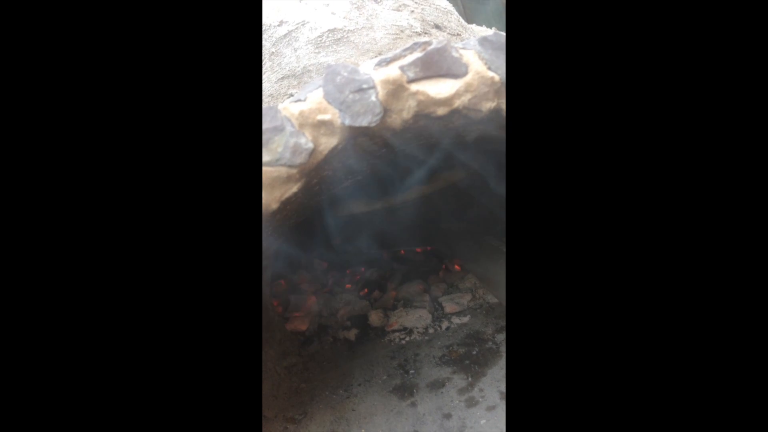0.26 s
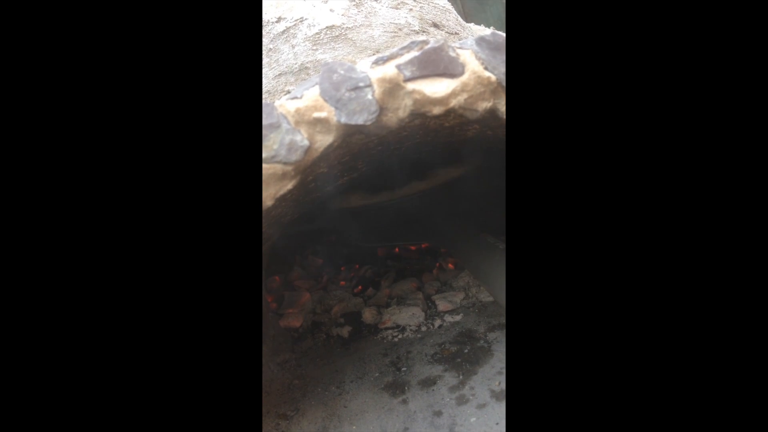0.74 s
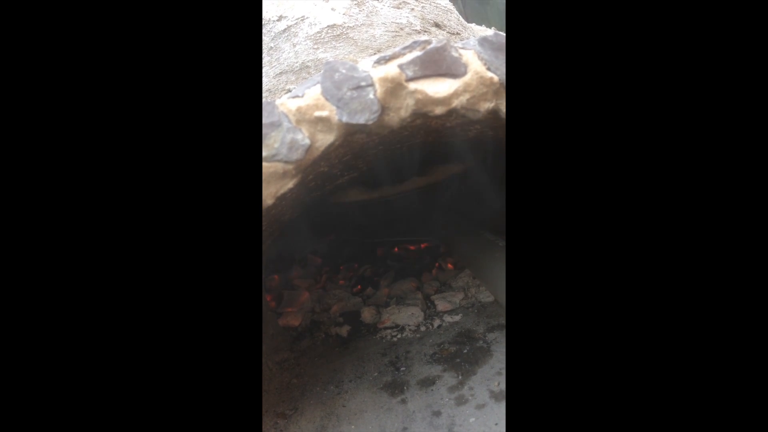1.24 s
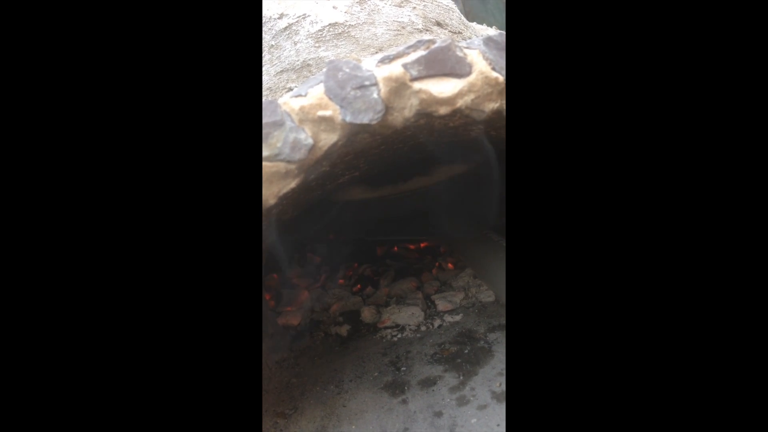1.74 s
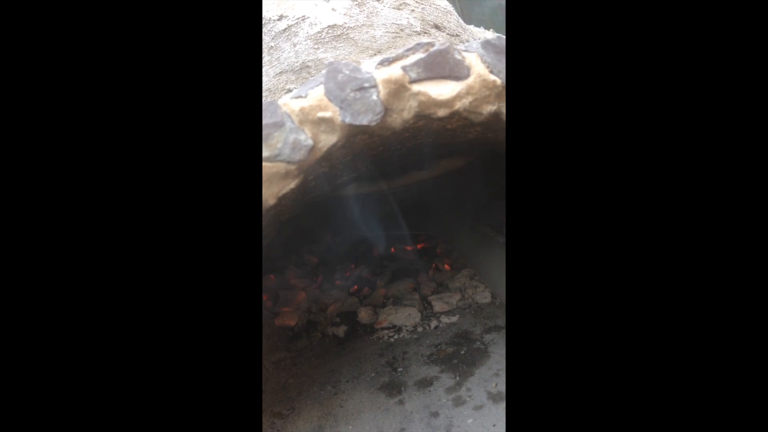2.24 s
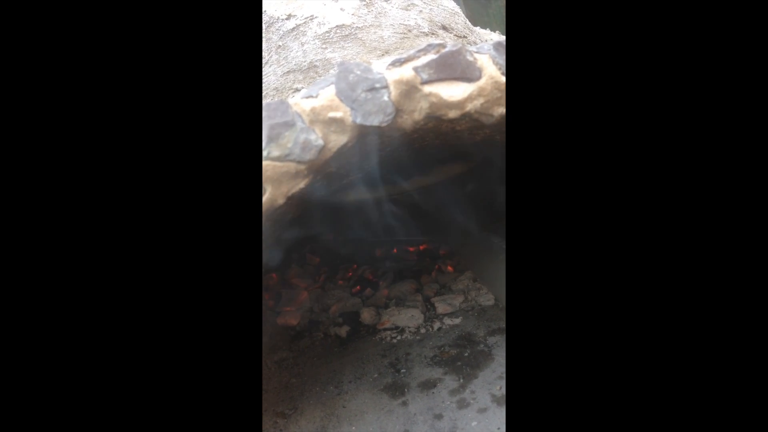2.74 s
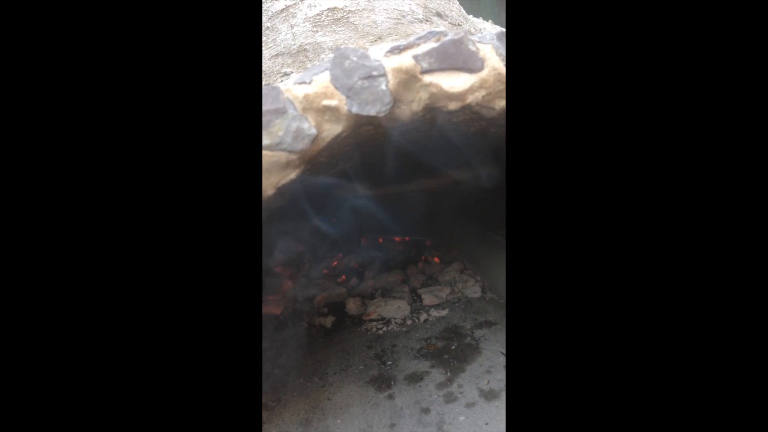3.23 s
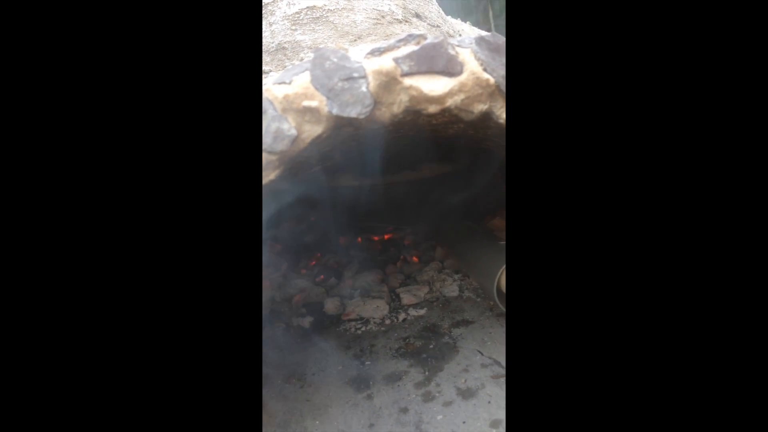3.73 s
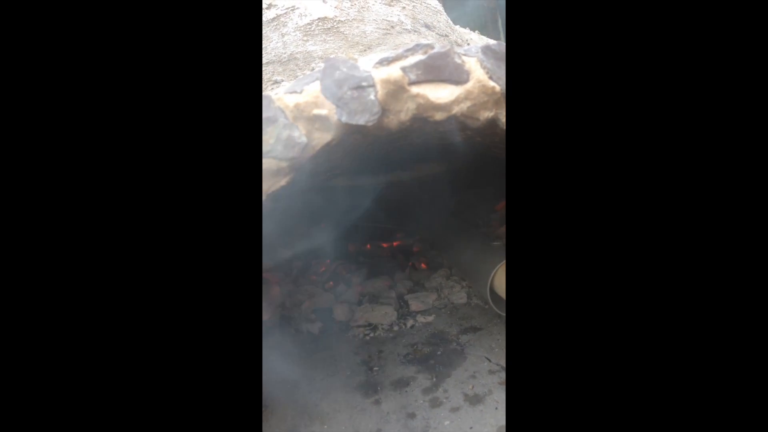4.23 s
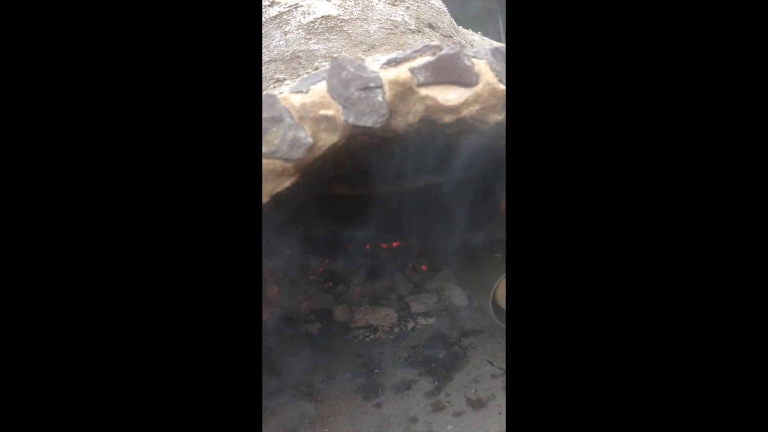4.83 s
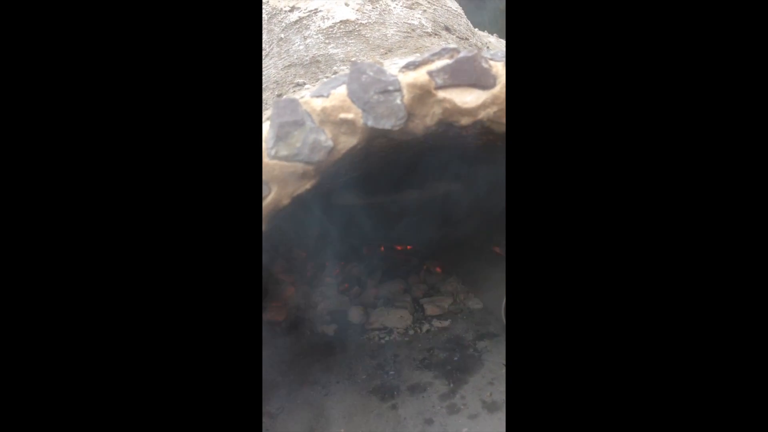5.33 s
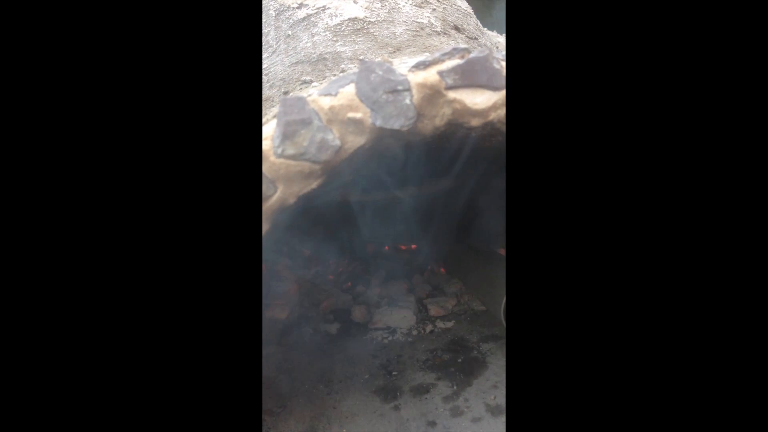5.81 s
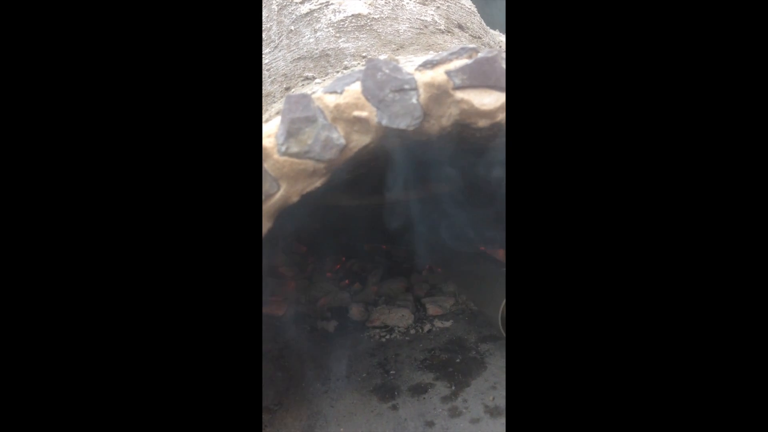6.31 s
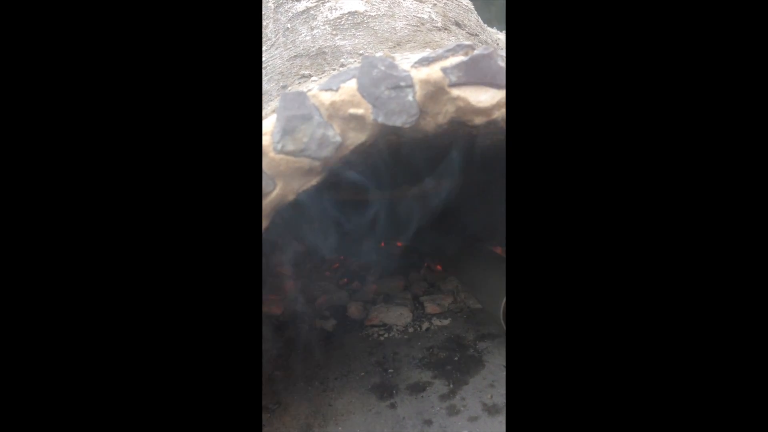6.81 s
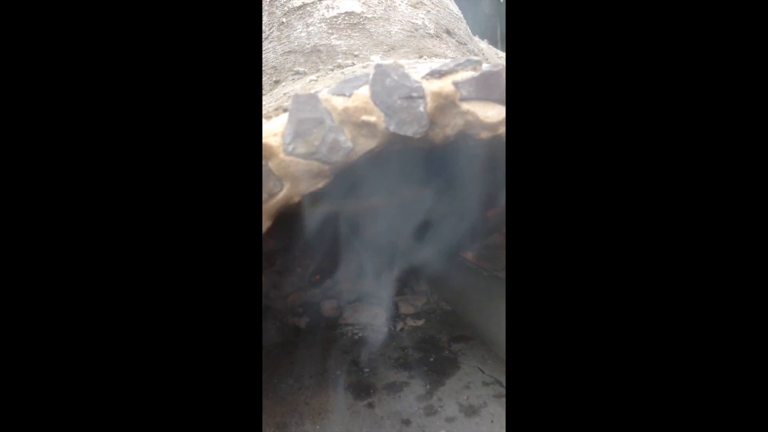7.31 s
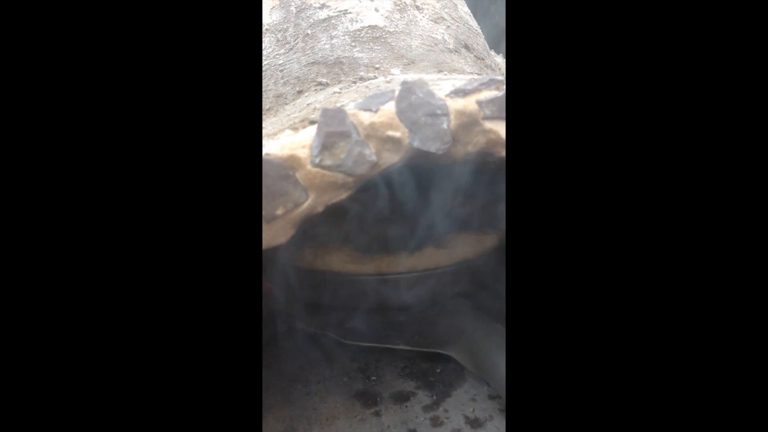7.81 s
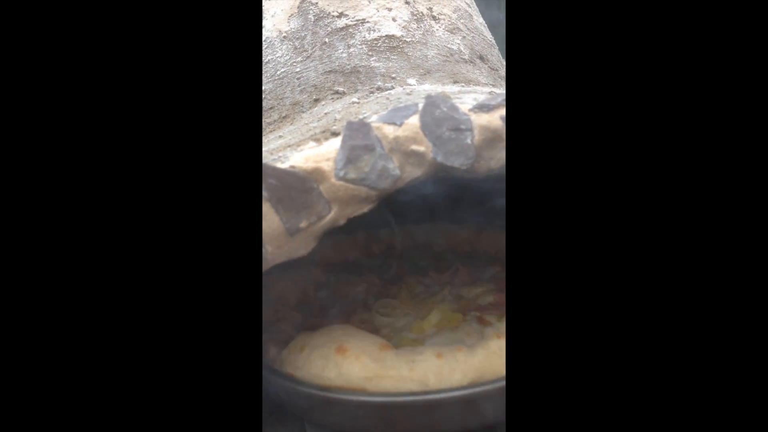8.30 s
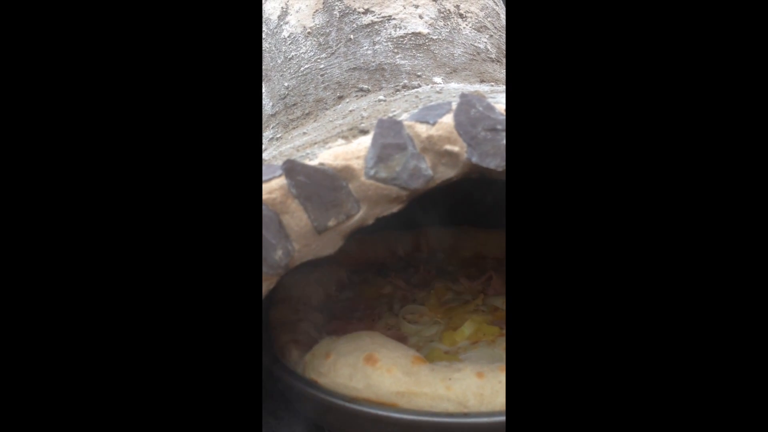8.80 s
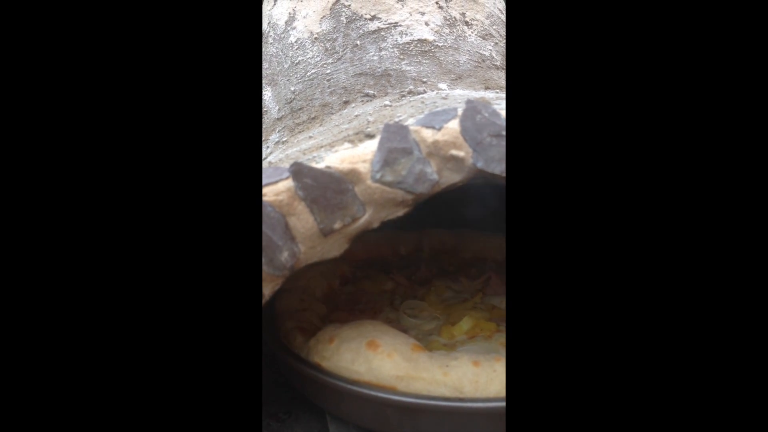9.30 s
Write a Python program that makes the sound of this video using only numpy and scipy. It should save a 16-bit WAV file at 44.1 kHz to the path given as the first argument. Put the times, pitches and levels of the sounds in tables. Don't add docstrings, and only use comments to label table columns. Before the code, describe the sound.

Close to the mouth of a small outdoor stone oven, hot charcoal ticks and snaps irregularly over a very faint, fine sizzle. A few snaps leap out sharply. Soft metallic nudges come partway through, then a small crumble of coals. Near the end a metal pan is knocked hard and dragged over stone, scraping grit, while crackling continues. Distant traffic and a low machine hum lie underneath.

```python
import sys
import numpy as np
from scipy import signal
from scipy.fft import rfft, irfft
from scipy.io import wavfile
from scipy.ndimage import uniform_filter1d

SR = 44100
rng = np.random.default_rng(int(sys.argv[2]) if len(sys.argv) > 2 else 0)


def inscribe(sig):
    pcm = np.round(np.clip(np.atleast_2d(sig).T, -1, 1) * 32767)
    wavfile.write(sys.argv[1], SR, pcm.astype(np.int16))


def volts(x):
    e = np.asarray(x, float) / 20
    return 10 ** e


N = 421141


def evened(x):
    return x / np.sqrt(np.mean(x ** 2) + 1e-20)


def add(mix, s, sound):
    part = mix[round(s * SR):][:len(sound)]
    part += sound[:len(part)]


def coloured(x, points):
    hz, db = np.transpose(points)
    bins = np.fft.rfftfreq(len(x), 1 / SR)
    gain_db = np.interp(np.log(bins + 1), np.log(hz + 1), db)
    return irfft(rfft(x) * volts(gain_db), len(x))


def resonate(x, hz, width_hz):
    r = np.exp(-np.pi * width_hz / SR)
    poles = [1, -2 * r * np.cos(2 * np.pi * hz / SR), r * r]
    return (1 - r * r) / 2 * signal.lfilter([1, 0, -1], poles, x)


def wander(rate_hz):
    steps = rng.standard_normal(int(N / SR * rate_hz) + 2)
    return evened(np.interp(np.arange(N) / SR * rate_hz, np.arange(len(steps)), steps))


def flutter(size, depth_db, samples):
    return volts(depth_db * evened(uniform_filter1d(rng.standard_normal(size), int(samples))))


def rings(modes, t, spread_db):
    out = np.zeros(len(t))
    for hz, db, t60_s in modes:
        level_luck, pitch_luck = rng.standard_normal(2)
        fade = volts(db + spread_db * level_luck - 60 * t / t60_s)
        out += fade * np.sin(2 * np.pi * hz * (1 + 0.0053 * pitch_luck) * t)
    return out


# (frequency [Hz], level [dB])
SPLIT_SPECTRUM = [(500, -64), (1100, -62), (1500, -8.5), (2500, -11), (3200, -9.5), (4400, -5.5),
                  (6600, -3.5), (9100, 2), (14000, -2), (17000, 0.5)]
# (frequency [Hz], level [dB], t60 [s])
DOME_MODES = [(1510, -16, 0.02), (3280, -15.5, 0.0064), (4294, -16.5, 0.034), (9300, -17, 0.012)]


def snap(hz, bright_db):
    t = np.maximum(np.arange(1024) / SR - 0.001, 0)
    split = np.minimum(t / 0.00065, 1) * volts(-60 * np.maximum(t - 0.0007, 0) / 0.0034)
    echoes = volts(-15 - 60 * t / 0.029) * (t > 0)
    spectrum = rfft(rng.standard_normal(1024) * (split + echoes))
    even = irfft(spectrum / np.sqrt(uniform_filter1d(abs(spectrum) ** 2, size=60)))
    tilt = [(5000, 0.012), (8000, 0.7 * (bright_db + 6))]
    burst = coloured(coloured(even, SPLIT_SPECTRUM), tilt)
    ring_db = 6 - 0.36 * (bright_db + 12)
    burst = burst + volts(ring_db) * resonate(burst, hz, 0.035 * hz)
    burst = burst / abs(burst).max()
    dome_db = -11.5 - 0.33 * (bright_db + 22.5)
    return burst + volts(dome_db) * rings(DOME_MODES, t, 3)


# (time [s], peak [dB], chip pitch [Hz], share above 7 kHz [dB])
SNAPS = [(0.439, -33, 4200, -9), (1.065, -29.5, 4360, -7.5), (1.4193, -32, 4160, -8),
         (1.6095, -14.5, 11000, -8.5), (2.3413, -33, 2970, -21), (2.4654, -7, 8800, -15),
         (2.523, -31.5, 9100, -20), (2.5496, -26, 9300, -6), (2.5661, -17, 8840, -13),
         (2.6119, -32, 9940, -25), (2.8192, -30.5, 4250, -12), (2.8322, -26, 10200, -8),
         (3.4045, -14, 10900, -5.5), (3.9071, -19, 11400, -18), (4.1768, -30.5, 12400, -8),
         (0.8796, -37.5, 4240, -48), (6.1368, -18, 4160, -15), (6.1578, -28, 4400, -18),
         (6.1912, -33, 2280, -18), (6.21, -31.5, 2350, -27), (6.6813, -30, 5960, -23),
         (7.6151, -32, 3560, -34), (8.1547, -6.5, 8430, 1.5), (8.195, -26, 7950, -4),
         (8.5036, -32, 12900, -4), (8.9735, -33, 10350, -4), (9.1244, -27, 6500, -11.5),
         (9.3327, -24.5, 6300, -15.5), (9.42, -26.5, 3450, -32.5), (9.4881, -27, 6400, -17.5)]
# (time [s], peak [dB])
LARGE_TICKS = [(1.713, -39.5), (1.8004, -39), (1.815, -42), (1.884, -45), (1.986, -45), (2.5084, -40),
               (2.7863, -44), (3.017, -39), (3.2882, -39), (4.021, -41), (7.1856, -42), (7.4874, -46),
               (7.6575, -39.5), (7.9553, -44), (9.0688, -39), (9.1057, -41), (9.2528, -40.5), (9.2913, -40)]
MEDIUM_TICKS = [(0.1, -35.5), (.171, -45), (0.186, -39), (.2643, -39.5), (0.2894, -43), (.4963, -46),
                (0.5923, -38.5), (0.721, -44), (.9911, -40), (1.1413, -42), (1.1662, -34.5),
                (1.2413, -39.5), (1.505, -45), (1.5464, -38.5), (1.679, -47), (1.7482, -40.5),
                (1.7923, -39), (2.3324, -35), (2.4094, -41), (2.7144, -36.5), (2.9394, -38), (2.9504, -40),
                (3.2733, -33), (4.4442, -43), (4.6878, -40.5), (4.83, -49.5), (5.05, -45), (6.2539, -44),
                (6.63, -40), (9.1548, -36)]
SMALL_TICKS = [(.1251, -41), (.9472, -41.5), (1.0987, -41), (1.113, -38), (2.1306, -44), (2.501, -40),
               (3.101, -44), (3.4726, -34.5), (6.2302, -37), (6.3773, -40), (6.6161, -39), (6.6522, -41),
               (7.5722, -40.5), (7.58, -39.5), (7.8554, -44), (8.6914, -37.5), (8.761, -41), (8.781, -33.5),
               (8.855, -35), (8.8642, -37.5), (9.176, -40), (9.207, -37.5)]
TINY_TICKS = [(.0687, -35.5), (.1979, -34), (.2179, -36.5), (.6724, -35), (2.3544, -39), (2.373, -44),
              (2.7608, -44), (2.882, -37), (3.0287, -33.5), (3.1444, -43), (3.1794, -37), (3.2133, -40),
              (3.516, -40), (3.5963, -39.5), (3.9521, -38), (4.008, -37), (4.0527, -38), (4.5687, -37),
              (4.956, -34.5), (4.9828, -38), (5.9105, -40.5), (6.0946, -36), (7.253, -38.5),
              (6.7448, -38.5), (6.7697, -40), (7.8411, -40), (8.819, -37.5), (9.431, -33), (9.5232, -37),
              (9.534, -42)]
# (pitch [Hz], pitch spread [0-1], share above 7 kHz [dB])
CHIPS = [
    (3280, .03, -27.5),
    (4220, 0, -24),
    (6500, 0.11, -23),
    (10400, 0.19, -16),
]
# (frequency [Hz], level [dB])
THIN = [(2200, -3.5), (3200, -1)]


def coals():
    loud, ticking = np.zeros((2, N))
    lead_s = 0.0004
    for s, db, hz, bright_db in SNAPS:
        add(loud, s - lead_s, volts(db - 0.5) * snap(hz, bright_db))

    tables = (LARGE_TICKS, MEDIUM_TICKS, SMALL_TICKS, TINY_TICKS)
    for table, (hz, spread, bright_db) in zip(tables, CHIPS):
        for s, db in table:
            chip_hz = hz * np.exp(spread * rng.uniform(-1.7, 1.7))
            add(ticking, s - lead_s, volts(db - 1.5) * snap(chip_hz, bright_db))

    s, _, lively_db = np.transpose(SIZZLE)
    ticks_per_s = 160 * volts(1.1 * np.interp(np.arange(N) / SR, s, lively_db))
    level_db = -56.5 + 2.8 * np.minimum(rng.exponential(1, N), 3) + np.zeros(N)
    excess = (level_db + 56.5) / 2.8
    ticks = (rng.random(N) < ticks_per_s / SR) * volts(-56.5 + 2.8 * excess)
    kind = rng.integers(0, 12, N)
    for k, hz in enumerate(np.geomspace(2900, 7000, 12)):
        ticking += signal.oaconvolve(ticks * (kind == k), snap(hz, -22 + 1.2 * k))[:N]
    return loud + coloured(ticking, THIN)


# (time [s], sizzle [dB], liveliness [dB])
SIZZLE = [(0, -65.5, 2), (.56, -66, 0), (1.3, -68, 2.5), (2.44, -67, 2), (3.4, -66.5, -1), (4.3, -66, -3),
          (5.98, -68.5, -6), (6.3, -65.5, -2.5), (7.36, -67, -2.5), (8, -63, 2), (8.6, -62, -3.5),
          (9.55, -62, 0)]
# (frequency [Hz], density [dB per Hz])
FIZZ = [(880, -34), (1500, -10), (2770, -11), (4160, -5), (6430, -0.5), (12600, 0), (15400, -4.5),
        (16000, -30.5)]


def sizzle():
    s, fizz_db, lively_db = np.transpose(SIZZLE)
    t = np.arange(N) / SR
    high, low = rng.standard_normal((2, N)) * volts([0.98 * wander(150), 2 * wander(60)])
    dome = resonate(low, 3260, 700) + volts(-2.5) * resonate(low, 4060, 400)
    fizz = volts(np.interp(t, s, fizz_db)) * evened(coloured(high, FIZZ))
    return fizz + volts(np.interp(t, s, lively_db) - 72.5) * evened(dome)


# (frequency [Hz], level [dB], t60 [s])
PAN_MODES = [(94, -1.5, 0.13), (250, -13.5, 0.061), (434, 2, 0.04), (436, -24.5, 0.071), (802, -6.5, 0.044),
             (1026, -12, 0.067), (1230, 0.5, 0.023), (1436, -3, 0.033), (1920, -2, 0.014),
             (2350, -19, 0.052), (2565, -11.5, 0.058), (2834, 3, 0.013), (3390, -5, 0.034),
             (4400, -17.5, 0.034)]


def knock(db, hz, bright_db, t60_s):
    t = np.arange(5000) / SR
    modes = []
    for mode_hz, mode_db, mode_t60_s in PAN_MODES:
        treble_db = (bright_db + 1.5) * (mode_hz > 2450)
        off_db = 4.94 * abs(np.log2(mode_hz / hz))
        modes.append((mode_hz, mode_db + treble_db - off_db, mode_t60_s * t60_s / 0.052))
    spot = [(hz, -1, 0.5 * t60_s), (0.903 * hz, -6, 0.45 * t60_s)]
    sound = rings(modes, t, 1.5) + rings(spot, t, 1)
    sound = sound * np.minimum(t / 0.00034, 1)
    return volts(db) * sound / abs(sound).max()


def shake(slips, resonances):
    out = np.zeros(len(slips))
    for hz, width_hz, db in resonances:
        puffs = slips * flutter(len(slips), 3.6, 500)
        narrowed = resonate(resonate(puffs, hz, 1.94 * width_hz), hz, 1.17 * width_hz)
        out += volts(db) * narrowed / np.sqrt(width_hz)
    return evened(out)


def drag(stroke, shaken, rough_db, swell_db, grit_db, follow, escape):
    start_s, rise_s, t60_s, peak_db, rim_db = stroke
    t = np.arange(11000) / SR
    fade_db = np.where(t < rise_s, swell_db * (1 - t / rise_s), 60 * (t - rise_s) / t60_s)
    slips = rng.standard_normal(len(t)) * flutter(len(t), rough_db, 120)
    kept_db = escape * fade_db
    part_db = (0, rim_db + kept_db, grit_db + follow * rim_db + kept_db)
    sound = np.zeros(len(t))
    for part, db in zip(shaken, part_db):
        sound += volts(peak_db - fade_db + db) * shake(slips, part)
    ends = np.clip(np.minimum(t / 0.0011, 20 * (t[-1] - t)), 0, 1)
    return start_s, sound * ends


# (time [s], peak [dB], loudest pitch [Hz], share above 2.5 kHz [dB], t60 [s])
KNOCKS = [(0.187, -54, 400, -9, 0.073), (0.312, -47, 1050, 2, 0.041), (3.306, -46, 2100, 12, 0.096),
          (3.774, -39, 1190, -5, 0.084), (6.135, -32, 1650, -12, 0.042), (7.204, -41, 2260, 3, 0.073),
          (7.216, -32, 3800, 4, 0.093), (7.744, -15.5, 1920, 1, 0.017), (7.76, -9, 1320, 2.5, 0.084),
          (8.008, -18, 1430, -16, 0.038), (8.021, -27, 1300, -18, 0.022), (8.034, -20, 1950, -15, 0.055),
          (8.076, -19.5, 1340, -4, 0.027), (8.085, -25, 1940, -9, 0.084), (8.171, -39, 465, -4, 0.025),
          (8.246, -24, 1230, -5, 0.06), (8.327, -37, 3300, -15, 0.051), (8.405, -43.5, 2800, -5, 0.14)]
# (start [s], rise [s], t60 [s], body peak [dB], rim over body [dB])
DRAGS = [
    (7.741, 0.022, 0.035, -30.5, -7),
    (7.761, 0.0015, 0.085, -27, -8),
    (8.007, 0.026, 0.14, -34.5, -5),
    (8.066, 0.025, 0.11, -29, -5.5),
]
NUDGES = [
    (3.304, 0.014, 0.11, -40, -3),
    (3.81, 0.016, 0.092, -44.5, -3),
    (7.06, .04, 0.042, -61, -3),
    (7.2, 0.017, 0.13, -51.5, 8.5),
    (7.258, .006, 0.15, -54.5, -5),
    (7.28, 0.01, 0.13, -58, -2),
    (7.675, 0.0079, 0.07, -58.5, 2),
]
SLIDES = [
    (8.166, 0.0055, 0.8, -52, -2),
    (8.238, 0.011, 0.12, -45, -10),
    (8.311, 0.027, 0.36, -49.5, -1.5),
    (8.394, 0.0045, 0.38, -49.5, -0.5),
    (8.471, 0.069, 0.14, -58.5, -2.5),
    (9.029, .02, .5, -67, 5),
]
CRUMBLES = [
    (4.02, 0.0085, 0.22, -60.5, 6.5),
    (5.296, 0.0087, 0.12, -72, 13),
    (6.14, .004, 0.53, -54.5, -1.5),
    (6.186, .004, 0.15, -55, -9),
]
# (frequency [Hz], width [Hz], level [dB])
DRAGGED = [
    [(326, 194, 0), (448, 40, 3.5), (1330, 160, 6), (2010, 110, 4), (1300, 650, -15)],
    [(2654, 85, -0.5), (3300, 130, -2), (4230, 5000, 4.5)],
    [(5900, 120, -7), (6500, 3500, -8.5), (8800, 8300, -7.5)],
]
NUDGED = [
    [(440, 41, -11.5), (610, 84, -13.5), (1085, 150, -7.5), (1300, 530, -9), (2240, 43, -12.5)],
    [(2800, 180, -3.5), (3300, 450, -3.5), (4200, 2050, -1.5)],
    [(6500, 4300, 9), (9800, 6700, 4)],
]
SLID = [
    [(297, 110, -4), (475, 50, 2), (1260, 100, -3.5), (960, 770, 2)],
    [(2800, 260, -9), (3300, 210, -4.5), (3900, 2100, -5)],
    [(5300, 4400, -2), (7800, 1600, -4.5), (8700, 11000, 5)],
]
CRUMBLED = [
    [(2180, 1200, -1)],
    [(3350, 1700, 1), (3750, 790, -7), (4400, 130, -12)],
    [(6300, 3500, -1.5), (10300, 7300, -0.5)],
]
# (roughness [dB], swell to peak [dB], grit over body [dB],
# share of rim gain grit follows [1], share of fade rim and grit escape [1])
STROKES = [
    (2, 6, -4.5, 0.85, -.2),
    (2, 7, -4.5, 0.052, -0.3),
    (1.5, 10, 3, 0.89, 0.2),
    (3.5, -1, 8, -0.27, -0.0074),
]


def pan():
    out = np.zeros(N)
    for s, *blow in KNOCKS:
        add(out, s + 0.000914, knock(*blow))
    tables = (DRAGS, NUDGES, SLIDES, CRUMBLES)
    for table, shaken, rule in zip(tables, (DRAGGED, NUDGED, SLID, CRUMBLED), STROKES):
        for stroke in table:
            add(out, *drag(stroke, shaken, *rule))
    return coloured(out, [(14800, -1), (15600, -41)])


# (frequency [Hz], level [dB])
YARD = [(15, -38), (25, -13.5), (64, -2.5), (112, -3.5), (146, -3), (178, -8.5), (405, -16), (494, -18.5),
        (616, -19), (695, -16), (816, -15.5), (1040, -14), (1320, -22), (1820, -26), (3000, -31.5),
        (3900, -64), (6600, -120)]
# (frequency [Hz], width [Hz], level [dB])
HUM = [(96.5, 11.7, -67), (129.7, 8.7, -69.5), (204, 2.3, -78.5), (264.1, 5, -80), (415, 2.5, -83),
       (610, 12, -83)]


def yard():
    wash_db = -58 - 4.5 + 0.91 * wander(1.47)
    out = volts(wash_db) * evened(coloured(rng.standard_normal(N), YARD))
    machine_hz = 55.1 + 1.8 * wander(8)
    out += volts(-62.5 + 1.5 * wander(6)) * np.sin(2 * np.pi * np.cumsum(machine_hz) / SR)
    for hz, width_hz, db in HUM:
        line = resonate(resonate(rng.standard_normal(N), hz, width_hz), hz, width_hz)
        out += volts(db) * evened(line)
    return out


def scene():
    return (coals() + sizzle() + pan() + yard())[None]


def top_cut(x):
    return signal.sosfilt(signal.butter(12, 16520, fs=SR, output="sos"), x)


# (frequency [Hz], level [dB])
EDGE = [(25, -6), (48, -6), (60, 0.5), (15150, -0.5), (15450, -57), (15900, -28), (16450, -35)]


def record(dry):
    return top_cut(coloured(dry[0], EDGE)[None])


dry = scene()
out = record(dry)
inscribe(out)
```